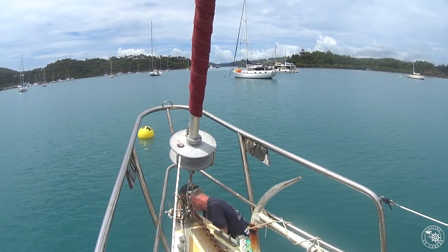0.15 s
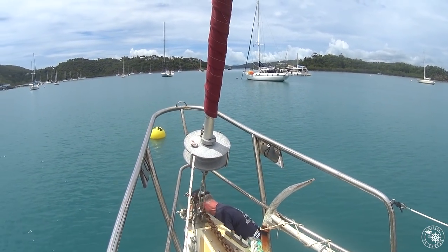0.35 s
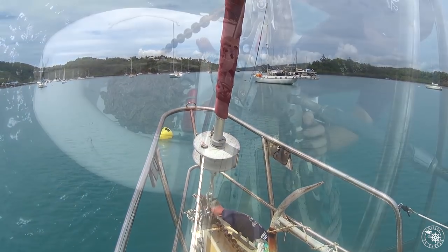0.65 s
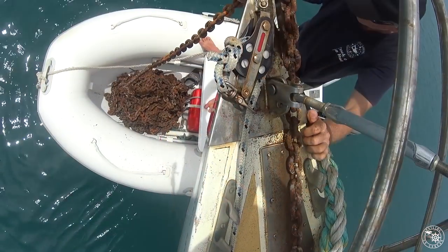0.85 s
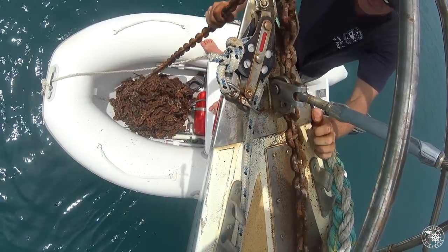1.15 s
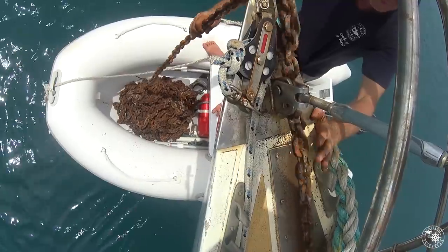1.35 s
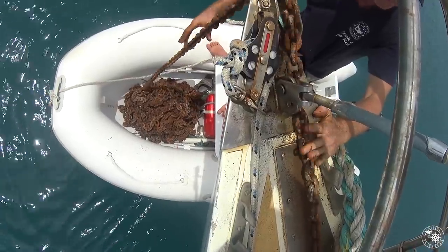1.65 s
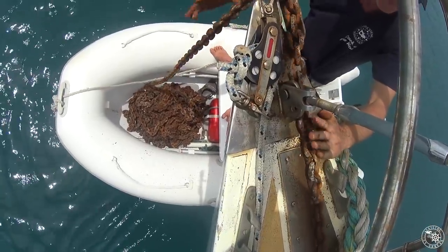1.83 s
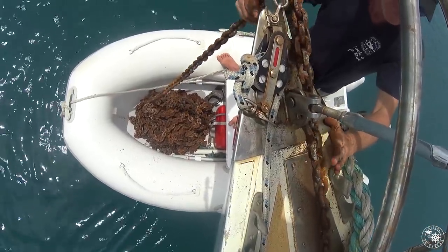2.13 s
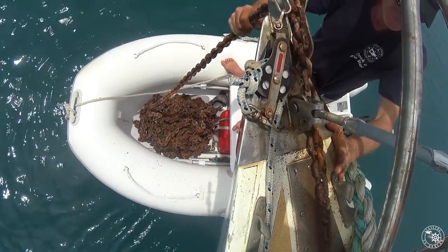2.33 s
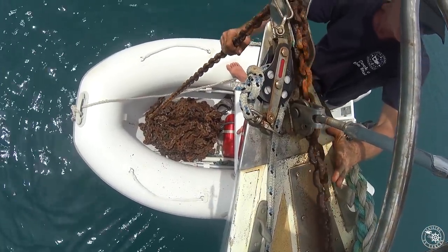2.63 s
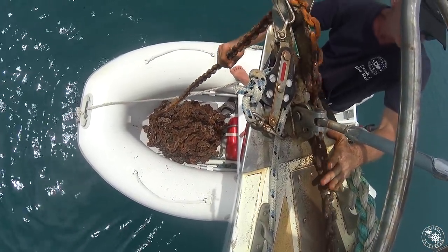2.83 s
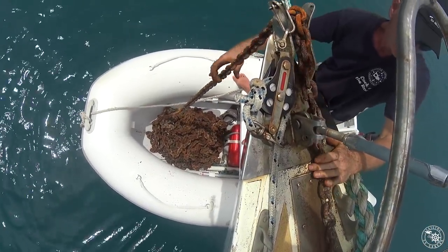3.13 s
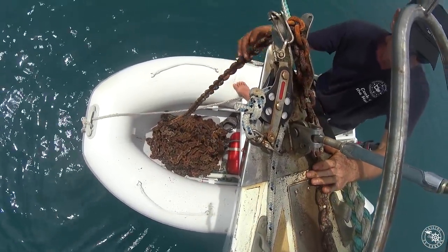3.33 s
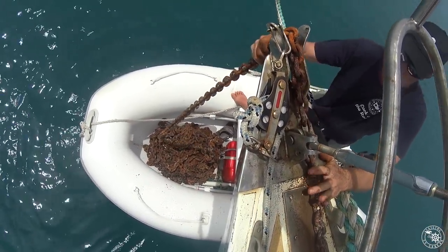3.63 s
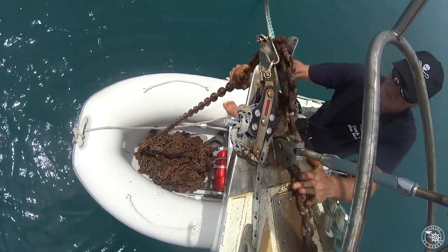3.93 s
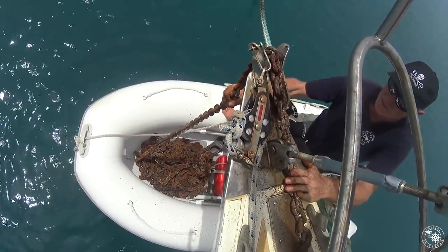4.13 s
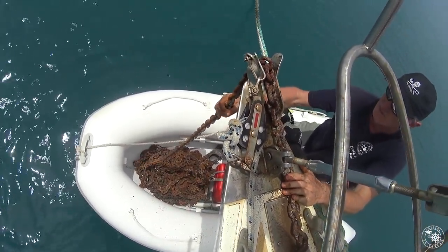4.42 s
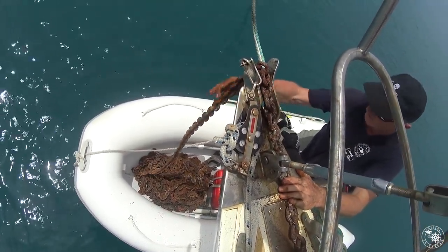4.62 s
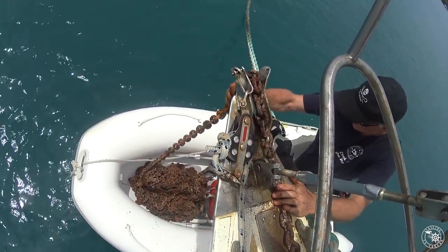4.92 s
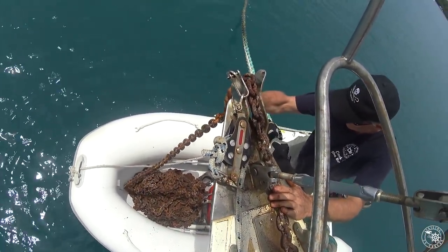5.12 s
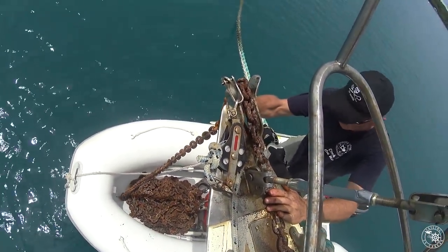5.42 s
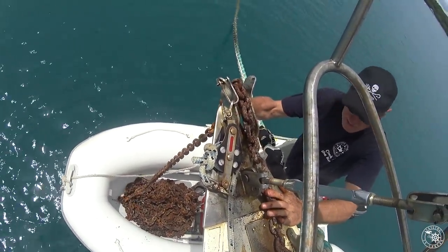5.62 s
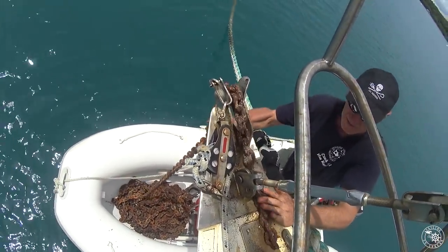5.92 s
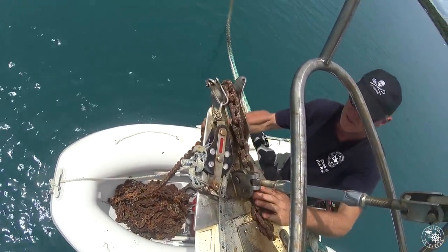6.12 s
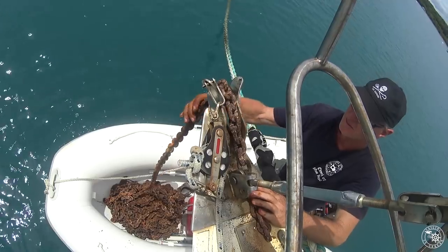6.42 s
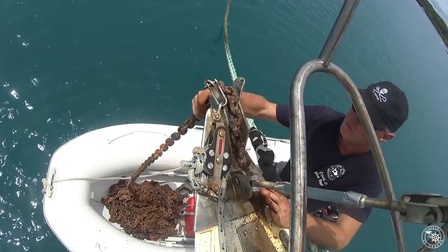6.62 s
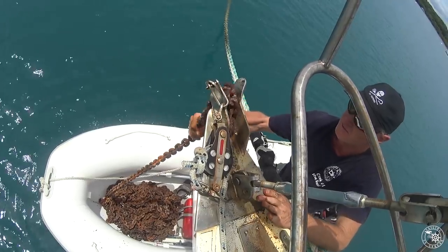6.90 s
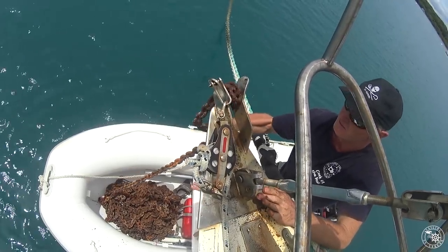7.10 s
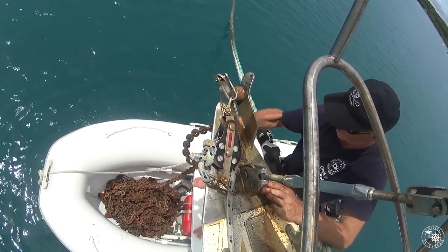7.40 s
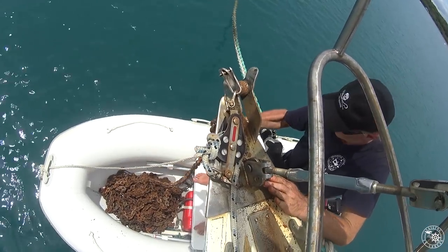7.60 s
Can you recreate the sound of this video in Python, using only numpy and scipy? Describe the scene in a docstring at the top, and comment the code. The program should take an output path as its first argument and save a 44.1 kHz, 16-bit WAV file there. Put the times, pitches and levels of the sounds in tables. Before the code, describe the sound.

Close by on a boat, rusty chain links scrape and clatter across a steel roller, squealing sharply as they rub. The hauling comes in uneven pulls: a long run, a brief tug, a lull with small snaps and dull knocks, then more ringing clanks before it settles. Small waves slap the hull and wind softly buffets the microphone, mostly late on, over a faint low hum.

```python
"""A rusty anchor chain is hauled by hand over a steel bow roller, in pulls with rests between.
Friction excites the modes of the links, which squeal near 10 kHz; stick-slip makes a jammed link groan.
Dense small contacts grind, single impacts clank and ring, and rust and rope snap in the pauses.
The deck knocks, wavelets slap the hull, and wind rumbles on a small microphone.
Underneath lies a steady background: low boat hum with faint lapping water."""
import sys
import numpy as np
from scipy import signal
from scipy.fft import rfft, irfft, next_fast_len
from scipy.io import wavfile
from scipy.ndimage import uniform_filter1d

SR = 44100
rng = np.random.default_rng(int(sys.argv[2]) if len(sys.argv) > 2 else 0)


def to_wav(sig):
    """Store sig (one row per channel, or 1-D mono) as 16-bit WAV at the path in sys.argv[1].

    Samples outside -1..1 are clipped; the rate is SR.
    """
    pcm = np.clip(np.atleast_2d(sig), -1, 1) * 32767
    pcm = np.round(pcm).astype(np.int16)
    wavfile.write(sys.argv[1], SR, pcm.T)  # frames by channels


N = 342083

# links rubbing over the roller: t/s of the bite, grip time/s, level/dB at the bite, gain/dB over the grip
RUBS = [(.039, 0.15, -34, -16), (.2, 0.044, -38.5, 11), (.335, 0.031, -31, -10), (.42, 0.037, -35.5, 6.5),
        (.51, 0.029, -38, 6), (.6, .01, -39, -2), (.63, 0.027, -35.5, 1.5), (0.709, 0.036, -36.5, -9),
        (.929, 0.1, -19, -3.5), (1.135, 0.11, -14.5, -6), (1.311, 0.045, -21, -3),
        (1.474, 0.078, -15.5, -7.5), (1.618, 0.069, -18.5, 5), (1.813, 0.14, -20.5, -6.5),
        (2.27, 0.094, -25.5, 8.5), (2.401, 0.016, -24, -6), (2.526, 0.096, -28, 13),
        (2.739, 0.11, -23.5, 2.5), (3.018, 0.077, -19.5, -14.5), (3.658, 0.2, -28.5, -5),
        (3.895, 0.053, -15, -9), (4.034, 0.095, -15.5, -17), (5.882, 0.08, -19.5, -21.5),
        (6.042, 0.053, -17, -27), (6.517, 0.15, -18, -12.5), (6.754, 0.0055, -17, -26),
        (6.806, 0.0078, -20, -7), (6.988, 0.0055, -24, -26)]
# modes of a link: f/Hz, bandwidth/Hz, level/dB
LINK_MODES = [(8380, 180, -5), (9050, 50, 6), (9580, 150, -7), (10240, 200, 7.5), (9680, 120, 6.5),
              (10810, 120, -0.5), (9000, 1500, -21)]
# course of the dragging: t/s, grind level/dB, deck rumble level/dB
DRAG_LEVELS = [(0, -40.5, -42), (.1, -58.5, -52), (.22, -46.5, -46.5), (.43, -45, -49), (.65, -56, -51),
               (.8, -57, -57), (.88, -34.5, -37), (1.2, -35, -41), (1.5, -30, -39), (2.05, -42, -39.5),
               (2.3, -32.5, -38.5), (2.76, -31.5, -46), (2.9, -33, -45.5), (3.05, -30, -39),
               (3.15, -74.5, -55), (3.61, -62.5, -54.5), (3.67, -32.5, -35.5), (3.86, -46, -51),
               (3.92, -36.5, -43), (4.1, -43, -45), (4.19, -76.5, -50), (4.8, -81, -55), (5.21, -62, -48),
               (5.28, -69, -45), (5.62, -70.5, -47.5), (5.78, -27, -32), (5.92, -33.5, -42),
               (6.05, -26, -33.5), (6.13, -74, -45), (6.4, -53, -46), (6.57, -33, -40), (6.74, -40, -63),
               (6.98, -25.5, -47), (7.05, -36, -45), (7.15, -48, -41), (7.25, -61.5, -46.5),
               (7.76, -65, -56)]
# impacts of links on the fitting: t/s of the peak, level/dB, rise time/s, T60/s, ring f/Hz
CLANKS = [(.048, -32, 0.0028, 0.026, 2330), (.162, -30, 0.0014, 0.036, 1350),
          (.197, -32, .0025, 0.086, 2200), (0.182, -35.5, 0.0015, 0.14, 3160), (.251, -34, .02, 0.3, 3050),
          (0.326, -23, .002, 0.028, 2270), (0.403, -23.5, 0.0042, 0.089, 2350),
          (.487, -21.5, .003, 0.19, 1500), (0.549, -25.5, 0.0065, 0.034, 1450),
          (0.595, -22.5, 0.0083, 0.045, 1480), (0.622, -24.5, 0.0076, 0.054, 1490),
          (.673, -33, 0.003, 0.1, 1490), (0.96, -19.5, .002, 0.075, 1820),
          (1.006, -10.5, 0.0017, 0.081, 2080), (1.054, -30, .002, 0.11, 1860),
          (1.094, -25.5, .002, 0.095, 2080), (1.148, -24.5, 0.0024, 0.047, 814),
          (1.241, -13, 0.017, 0.11, 1900), (1.31, -10.5, 0.0056, 0.025, 2000),
          (1.373, -14.5, 0.01, 0.12, 1640), (1.435, -18, 0.0028, .13, 1210),
          (1.521, -11.5, 0.0056, 0.09, 1820), (1.609, -13, 0.0076, 0.065, 1280),
          (1.649, -18, 0.0024, 0.2, 1990), (1.731, -15, 0.0042, 0.081, 1240),
          (1.761, -22, 0.0012, 0.025, 900), (1.808, -23, .016, 0.032, 1455),
          (1.889, -16.5, 0.0019, 0.026, 970), (1.943, -14.5, 0.0018, 0.31, 1300),
          (1.967, -18.5, 0.016, .14, 2040), (2.032, -16.5, 0.017, 0.099, 1380),
          (2.177, -19, 0.0036, 0.017, 1240), (2.257, -12.5, 0.028, 0.12, 1330),
          (2.47, -22, 0.033, 0.11, 1290), (2.55, -19.5, 0.021, 0.012, 1270),
          (2.582, -21, 0.0032, 0.04, 1570), (2.623, -13.5, 0.0045, 0.16, 1940),
          (2.729, -12, .0006, 0.076, 1410), (2.759, -9.5, 0.0087, 0.11, 1280),
          (2.914, -13.5, 0.00062, 0.063, 2030), (2.925, -13, .002, 0.04, 2210),
          (2.948, -10, .003, 0.1, 1260), (3.002, -14, 0.0042, 0.066, 1210),
          (3.37, -15.5, 0.00045, 0.071, 1210), (3.444, -31, 0.0015, .011, 2040),
          (3.78, -50.5, 0.0012, .045, 1250), (3.886, -12, 0.0047, 0.089, 1640),
          (3.952, -15.5, .0025, 0.19, 1500), (4.003, -17.5, .001, 0.21, 1640),
          (4.028, -12, 0.0021, .022, 1490), (4.081, -23.5, .006, 0.032, 1280),
          (4.108, -31, .0015, 0.035, 1090), (4.24, -21, .001, 0.037, 930), (4.3, -21, .003, 0.066, 1640),
          (4.323, -29, .001, 0.016, 2380), (4.35, -22.5, 0.0022, 0.091, 2460),
          (4.384, -24.5, 0.0005, 0.022, 1150), (4.488, -43, 0.00065, .014, 1140),
          (4.503, -38.5, .0005, .022, 800), (4.624, -46, .003, .05, 800), (4.736, -50, .001, .05, 800),
          (4.851, -43.5, .007, .095, 3720), (4.912, -21, 0.00048, .012, 1500),
          (4.924, -21, .0014, 0.044, 3740), (4.983, -36, .0025, 0.17, 1490),
          (5.103, -40.5, .0015, .06, 1570), (5.17, -31.5, .0014, .03, 890),
          (5.22, -34.5, 0.021, 0.19, 1600), (5.3, -25, 0.00041, 0.046, 3340), (5.64, -38, .004, 0.054, 969),
          (5.775, -23.5, 0.00152, 0.56, 2080), (5.832, -29, .002, 0.023, 1800),
          (5.862, -13, 0.00089, 0.094, 1980), (5.88, -10.5, 0.0083, 0.022, 1600),
          (5.917, -14, 0.0056, 0.24, 2480), (5.973, -14, 0.0093, 0.17, 2000),
          (6.098, -30, 0.0023, 0.039, 1550), (6.193, -36.5, .0014, 0.086, 3260),
          (6.309, -25, 0.00068, 0.026, 1220), (6.426, -33.5, .0012, 0.063, 2680),
          (6.586, -23, 0.014, 0.069, 830), (6.609, -26.5, 0.0036, 0.1, 1710),
          (6.643, -20, .002, 0.098, 1930), (6.682, -25, 0.00099, 0.041, 1290),
          (6.749, -10, 0.01, 0.26, 1340), (6.818, -9.5, 0.0074, 0.081, 3130),
          (6.85, -13.5, 0.0025, 0.1, 1340), (6.871, -14, .002, 0.055, 1530),
          (6.933, -11, .002, 0.037, 2150), (6.977, -18.5, .01, 0.045, 1250),
          (6.989, -10, .005, 0.094, 1320), (7.058, -8.5, 0.00071, 0.066, 1720),
          (7.078, -10, 0.0013, 0.036, 1300), (7.107, -12, 0.012, 0.1, 1280),
          (7.118, -17.5, .0014, 0.04, 1860), (7.159, -14, .0005, 0.11, 1820),
          (7.171, -18.5, .002, 0.1, 1260), (7.209, -19.5, 0.00073, 0.034, 1270),
          (7.276, -49.5, .0006, .011, 3350), (7.397, -35, .0016, .013, 4200),
          (7.468, -34, .0012, 0.027, 3950), (7.518, -22.5, 0.00083, 0.034, 790),
          (7.647, -37, .001, .01, 4240), (7.678, -42.5, 0.0016, .06, 3170)]


def link_squeaks():
    """Mode lock-in: friction sustains one mode of a link, a gliding tone that falters as rust grips."""
    # loud squeaks: t/s, duration/s, start f/Hz, end f/Hz, level/dB
    squeaks = [(0.041, .016, 10840, 10800, -27), (0.09, 0.031, 10900, 11000, -30),
               (0.133, .009, 10360, 10420, -21), (0.2, .008, 9500, 9240, -29),
               (0.323, .021, 10800, 10650, -32), (.417, .036, 10890, 10970, -32),
               (0.522, .016, 10500, 10400, -28.5), (0.929, .019, 10100, 9900, -11.5),
               (0.947, .023, 10300, 10960, -16), (.972, .008, 9120, 9160, -12),
               (1.015, .016, 10900, 10370, -15.5), (1.139, .011, 9500, 9740, -13),
               (1.146, .034, 9270, 9120, -15.5), (1.207, .022, 9400, 8880, -15),
               (1.315, .009, 9950, 9960, -12), (1.34, .009, 10050, 10730, -14),
               (1.378, .022, 9430, 8960, -17), (1.394, .014, 10740, 9930, -15),
               (1.475, .028, 9320, 9080, -15), (1.5, .01, 9650, 9800, -12), (1.527, .021, 9150, 8740, -19),
               (1.551, .005, 9450, 9500, -13), (1.617, .011, 10400, 10410, -15.5),
               (1.653, .027, 8940, 9040, -19.5), (1.689, .012, 10360, 10440, -19.5),
               (1.842, .032, 10460, 10670, -11.5), (1.89, .014, 10840, 11000, -13),
               (1.917, .026, 10570, 10230, -13), (2.272, .018, 10070, 10360, -12),
               (2.301, .009, 9620, 8900, -16), (2.317, .044, 10720, 10860, -16.5),
               (2.361, .009, 9890, 9860, -12), (2.404, .008, 9120, 9200, -17),
               (2.529, .008, 9590, 9500, -8), (2.556, 0.0049, 8980, 9170, -13),
               (2.566, .016, 9150, 9040, -11), (2.605, .01, 10660, 10400, -16),
               (2.627, .01, 9090, 8800, -17), (2.781, .016, 9760, 9900, -14),
               (2.802, .008, 11000, 10850, -11.5), (2.817, .02, 10450, 10900, -17.5),
               (2.84, .008, 10700, 11030, -12.5), (3.031, .04, 9550, 9960, -11.5),
               (3.07, .018, 10170, 9950, -12.5), (3.662, .033, 9910, 10100, -8.5),
               (3.705, .034, 10670, 10100, -15), (3.722, .031, 9900, 9700, -14),
               (3.759, .018, 9260, 9090, -7), (3.781, .028, 9740, 9500, -13), (3.818, .025, 9300, 9030, -9),
               (3.895, .043, 9120, 9160, -15.5), (3.925, .008, 9840, 9550, -13.5),
               (4.07, .013, 9150, 8920, -14), (4.108, .011, 9680, 10140, -14),
               (5.887, .008, 9270, 9000, -14.5), (5.937, .01, 9060, 9250, -18.5),
               (6.031, .047, 9580, 9800, -21), (6.046, .023, 8920, 9700, -16),
               (6.073, .031, 10160, 10620, -21.5), (6.511, .061, 10000, 10260, -21),
               (6.516, .042, 9840, 9620, -15.5), (6.569, .007, 10600, 10200, -13.5),
               (6.576, .037, 9100, 8930, -17.5), (6.607, .025, 9350, 9150, -14),
               (6.653, .005, 9180, 9180, -9.5), (6.809, .005, 9070, 8990, -19)]
    # faint chirps, some at half the pitch of a squeak: t/s, duration/s, start f/Hz, end f/Hz, level/dB
    chirps = [(2.53, .01, 4680, 4900, -27), (3.037, .008, 4960, 4860, -32),
              (3.778, 0.0074, 5130, 4840, -37), (3.816, .03, 4700, 4560, -36.5),
              (4.705, .037, 5800, 3400, -66), (4.845, .04, 3400, 3900, -59.5),
              (4.894, 0.028, 3100, 3940, -52)]
    lead_s, attack_s, release_db_per_s = .003, .0012, 2500
    out = np.zeros(N)
    falter = np.maximum(drift(120) - .5, 0)
    wobble = drift(90)
    for s, length, start_hz, end_hz, level_db in squeaks + chirps + faint_squeaks():
        t = np.arange(round((length + .04) * SR)) / SR
        hz = np.interp(t, [lead_s, lead_s + length], [start_hz, end_hz])
        release = from_db(-release_db_per_s * np.maximum(t - length - lead_s, 0))
        envelope = np.clip(t / attack_s, 0, 1) * release
        phase = 2 * np.pi * np.cumsum(hz) / SR + .8 * wobble[round(s * SR):][:len(t)]
        add(out, s - lead_s, from_db(level_db) * envelope * np.sin(phase))
    return out * from_db(1.5 - 6 * falter)


def faint_squeaks():
    """Brief lock-in: rows for two squeaks at random moments of each rub, each starting on a link mode."""
    mean_length_s, max_glide_hz, relative_db = .012, 200, -8.5
    rows = []
    for (s, grip, level_db, gain_db), draws in zip(RUBS, rng.random((len(RUBS), 2, 4))):
        for when, mode, glide, size in draws:
            start_hz = LINK_MODES[1 + int(mode * 5)][0]
            end_hz = start_hz + max_glide_hz * (2 * glide - 1)
            squeak_db = level_db + when * gain_db + relative_db
            rows.append((s + when * grip, mean_length_s * (.5 + size), start_hz, end_hz, squeak_db))
    return rows


def link_rubs():
    """Frictional excitation: slips of rust drive the link modes, each flaring and fading on its own."""
    bite_db_per_s, release_db_per_s = 2196.5, 900.5
    envelope = np.zeros(N)
    for s, grip, level_db, gain_db in RUBS:
        t = np.arange(-.03, grip + .06, 1 / SR)
        bite_db = bite_db_per_s * np.minimum(t, 0)
        grip_db = gain_db * np.clip(t / grip, 0, 1)
        release_db = -release_db_per_s * np.maximum(t - grip, 0)
        add(envelope, s + t[0], from_db(level_db + bite_db + grip_db + release_db))
    slips = grit(per_s=6000, spread_db=3.5)
    squeal = unit_rms(sum(from_db(db + 9 * drift(35)) * unit_rms(resonance(slips, hz, width)) * (-1) ** k
                          for k, (hz, width, db) in enumerate(LINK_MODES)))
    power = uniform_filter1d(squeal ** 2, size=900)
    return envelope * squeal / np.sqrt(power + .1)   # the modes share the friction power


def chain_drag():
    """Roughness noise: clumps of tiny contacts of rust on steel grind, and the deck rumbles along."""
    # spectrum of the grind: f/Hz, density level/dB
    grind_spectrum = [(290, -55), (500, -5.5), (786, -4.5), (1010, -1), (1350, 1), (2360, -9.5), (3760, -9),
                      (7370, -20), (8600, -28), (8940, -20.5), (11000, -16.5), (14300, -40.5),
                      (22000, -120)]
    grind_db, deck_db = in_time(DRAG_LEVELS)
    treble_db = -10.5 - .4 * (grind_db + 30)   # a light drag is relatively brighter
    contacts = grit(per_s=2500, spread_db=2.5) * from_db(3.4 * drift(30))
    ringing = unit_rms(steel_modes(contacts).sum(axis=0))
    steel = band(colour(contacts, grind_spectrum) + .26 * ringing, 600, 9000)
    low = signal.lfilter(*signal.butter(1, 3000, fs=SR), steel)
    grind = unit_rms(low) + from_db(treble_db) * unit_rms(steel - low)
    deck = unit_rms(band(grit(per_s=900, spread_db=2.7), 170, 640)) * from_db(4.1 * drift(20))
    return from_db(grind_db) * grind + from_db(deck_db) * deck


def steel_modes(force):
    """Modal response of chain and roller to a force, one row for each resonance."""
    # resonances of chain and roller: f/Hz, bandwidth/Hz, gain/dB
    modes = [(830.6, 51, -8), (1205, 110, -4.5), (1282, 20, -1.5), (1563, 62, 1.5), (1735, 50, -6.5),
             (2100, 200, 0.5), (2526, 67, -11.5), (3203, 39, -3.5), (3200, 11, -1), (3460, 43, -9.5),
             (3630, 70, -11.5), (4635, 80, -16), (5040, 68, -18.5), (6100, 78, -21)]
    return np.array([from_db(db) * resonance(force, hz, width) * (-1) ** k
                     for k, (hz, width, db) in enumerate(modes)])


def chain_clanks():
    """Impact excitation: each blow is a short crash that drives every mode with a random strength."""
    out = np.zeros(N)
    white = rng.standard_normal(N)
    chatter = grit(per_s=1800, spread_db=2.8)   # a crash is a run of tiny hits
    steel = unit_rms(band(chatter, 680, 4130))
    modes = unit_rms(steel_modes(chatter))
    deck = unit_rms(band(white, 320, 750))
    treble = unit_rms(band(chatter + white, 2300, 9700))
    blows = CLANKS + link_ticks()
    strengths = from_db(4.9 * rng.standard_normal((len(blows), len(modes))))
    for strength, (s, level_db, rise, t60, hz) in zip(strengths, blows):
        start = max(round((s - 5 * rise) * SR), 0)
        stop = min(start + round((5 * rise + 1.2 * t60) * SR), N)
        span = slice(start, stop)
        t = np.arange(start, stop) / SR - s
        envelope_db = np.where(t < 0, 8 * t / rise, -60 * t / t60)
        treble_db = -17 + .1 * (level_db + 12)   # harder blows are brighter
        ring = unit_rms(resonance(white[span], hz, width=150))
        crash = from_db(envelope_db) * (.49 * steel[span] + .32 * ring)
        crash += .093 * from_db(.71 * envelope_db) * (strength @ modes[:, span])   # the modes linger
        crash += .5 * from_db(treble_db + 5.4 * envelope_db) * treble[span]   # the treble dies first
        crash += .61 * from_db(-18.5 + .52 * envelope_db) * deck[span]   # the deck decays slowest
        age = np.maximum(t + rise, 0)
        click = np.exp(-rise / .003 - age / .0016) * np.sin(2 * np.pi * hz * age)   # strong if sudden
        out[span] += from_db(level_db) * (crash + 1.25 * click)
    return out


def link_ticks():
    """Random impacts: rows for sixty light blows whose strength follows the drag of the chain."""
    above_grind_db, spread_db, rise_s, mean_t60_s = 6, 6, .0015, .04
    low_hz, high_hz = 1100, 2530
    grind_db = in_time(DRAG_LEVELS)[0]
    rows = []
    for when, size, decay, pitch in rng.random((60, 4)):
        level_db = grind_db[int(when * N)] + above_grind_db + spread_db * (2 * size - 1)
        hz = low_hz * (high_hz / low_hz) ** pitch
        rows.append((when * N / SR, level_db, rise_s, mean_t60_s * (.5 + decay), hz))
    return rows


def link_groans():
    """Stick-slip oscillation: a jammed link slips regularly, giving a rough tone with harmonics."""
    # jams on the roller: t/s, duration/s, slip f/Hz, level/dB
    jams = [(0.543, 0.031, 1510, -32.5), (.59, 0.061, 1530, -37), (2.006, .036, 1450, -14.5),
            (2.214, 0.052, 1385, -13), (2.741, .025, 1300, -30.5), (3.874, 0.022, 1560, -18.5),
            (4.022, 0.0074, 1700, -20.5), (7.093, 0.018, 1310, -19), (7.157, 0.047, 1330, -18)]
    # harmonics of the slip frequency: order, level/dB
    harmonics = [(1, -1), (2, -13.5), (3, -12.5), (4, -30)]
    out, wobble = np.zeros(N), drift(70)
    for s, length, slip_hz, level_db in jams:
        t = np.arange(round(length * SR)) / SR
        phase = 2 * np.pi * slip_hz * t + .43 * wobble[round(s * SR):][:len(t)]
        tone = sum(from_db(db) * np.sin(order * phase) for order, db in harmonics)
        add(out, s, from_db(level_db) * np.sin(np.pi * t / length) ** .7 * tone)
    return out * from_db(2.5 * drift(120))


def steel_ring_outs():
    """Damped free vibration: a link rings as it lets go, the roller as the chain falls slack."""
    # links letting go: t/s, level/dB
    releases = [(1.04, -38.5), (1.26, -40), (1.71, -52), (1.96, -50), (2.64, -45), (2.86, -38.5),
                (3.1, -59), (4.13, -42.5), (6.11, -43.5), (7.18, -60)]
    # free modes of a link: f/Hz, relative level/dB, T60/s
    link_ring = [(10600, -0.5, .28), (8700, -12, .25)]
    # free modes of the roller: f/Hz, level/dB, T60/s
    roller_ring = [(1160, -34, 0.27), (1300, -36.5, .31), (1570, -41.5, .5), (3180, -35, 0.31)]
    slack_s, attack_s = 7.2, .004
    rings = [(s, hz, level_db + db, t60) for s, level_db in releases for hz, db, t60 in link_ring]
    rings += [(slack_s, *mode) for mode in roller_ring]
    out = np.zeros(N)
    for s, hz, level_db, t60 in rings:
        t = np.arange(round(t60 * SR)) / SR
        envelope = from_db(level_db - 60 * t / t60) * np.clip(t / attack_s, 0, 1)
        add(out, s, envelope * np.sin(2 * np.pi * hz * t))
    return out


def snaps():
    """Broadband transients: rust and rope snap brightly, and a duller crack opens each sudden clank."""
    # snaps of rust and rope in the pauses: t/s, level/dB
    dry_snaps = [(3.2624, -44), (3.4544, -34), (3.5747, -24.5), (4.176, -67), (4.3723, -24), (4.4558, -44),
                 (4.4863, -31.5), (4.503, -33), (4.6483, -52.5), (4.7326, -36), (4.814, -45),
                 (4.8414, -39.5), (4.8863, -31.5), (5.013, -37), (5.0594, -43.5), (5.1342, -35.5),
                 (5.352, -42.5), (5.4171, -38.5), (5.5648, -32), (6.3565, -49), (7.3243, -56), (7.502, -23),
                 (7.603, -35)]
    loss_db_per_s = 1999   # the slower a clank rises, the weaker its crack
    cracks = [(s - rise, db - 1 - loss_db_per_s * rise) for s, db, rise, t60, hz in CLANKS]
    return band(noise_bursts(dry_snaps), 2500, 11000) + band(noise_bursts(cracks), 1200, 6480)


def hollow_knocks():
    """Resonance of a hollow body: two close modes ring briefly inside a dull crash."""
    # knocks on the deck and gulps under the hull: t/s, level/dB, f/Hz, T60/s of the modes
    knocks = [(3.26, -30.5, 612, .08), (4.237, -16, 627, 0.1), (4.298, -20.5, 592, 0.1),
              (5.06, -47.5, 493, .05), (5.299, -27.5, 390, .035), (5.374, -25.5, 470, .095),
              (5.413, -29, 420, 0.087), (5.481, -33, 469, .08), (6.308, -34, 563, 0.067),
              (7.517, -37.5, 660, 0.18)]
    out = np.zeros(N)
    t = np.arange(round(.2 * SR)) / SR
    noises = unit_rms(band(rng.standard_normal((len(knocks), len(t))), 336, 1020))
    for (s, level_db, hz, t60), noise in zip(knocks, noises):
        modes = np.sin(2 * np.pi * hz * t) + .44 * np.sin(2 * np.pi * 1.1 * hz * t)
        envelope = from_db(level_db - 60 * t / t60) * (1 + .8 * np.exp(-t / .0034))
        crash = from_db(level_db - 8 - 35 * t / t60) * noise
        add(out, s, envelope * modes + crash)
    return signal.sosfilt(signal.butter(2, 250, "high", fs=SR, output="sos"), out + 1e-18)


def wavelet_and_gust_thuds():
    """Low pressure pulses: a Gaussian wave packet with a faint tail, its pitch rising a little."""
    # wavelets slapping the hull and gusts on the microphone: t/s, level/dB, f/Hz, duration/s
    thuds = [(0.597, -39, 216, 0.055), (0.897, -39, 322, 0.038), (1.456, -25, 316, 0.01),
             (1.747, -24, 330, 0.0077), (2.446, -30, 248, .016), (2.931, -31, 304, 0.012),
             (4.439, -35.5, 190, .011), (5.066, -25, 252, 0.0062), (5.557, -27.5, 94.5, 0.021),
             (5.831, -30, 278, 0.034), (6.125, -29, 89.6, 0.023), (6.304, -23.5, 125, 0.01),
             (6.36, -25.5, 212, 0.011), (6.404, -27, 203, 0.01), (6.532, -28, 180, .02),
             (6.836, -30.5, 101, .021), (6.957, -31.5, 195, 0.04), (7.251, -21.5, 281, 0.0071),
             (7.298, -8, 98, 0.0052), (7.436, -26, 112, 0.0089), (7.535, -13, 100.5, 0.0046),
             (7.562, -25, 98.3, .019)]
    out = np.zeros(N)
    t = np.arange(-.04, .1, 1 / SR)
    for s, level_db, hz, length in thuds:
        pulse = np.exp(-(t / (.22 * length)) ** 2 / 2)
        tail = .15 * from_db(-400 * t) * (t > 0)
        tone = np.sin(2 * np.pi * hz * (t + 5.5 * t ** 2))
        add(out, s + t[0], from_db(level_db) * (pulse + tail) * tone)
    return out


def wind_and_background():
    """Partly coherent noise in two channels: gusts on the microphone over a steady background."""
    # course of the wind: t/s, level/dB
    breeze = [(0, -62), (.6, -64), (.8, -90), (1, -73.5), (1.35, -78), (1.8, -59), (2.55, -54.5),
              (2.8, -79), (3.45, -48), (4.02, -70), (4.6, -49), (5.18, -44), (5.34, -50), (5.92, -40),
              (6.09, -42), (6.46, -40), (6.7, -48.5), (7.15, -34), (7.76, -49)]
    # spectrum of the wind: f/Hz, density level/dB
    wind_spectrum = [(12, -46.5), (20, -22.5), (118, 4), (145, -10.5), (203, -1), (338, -3.5), (387, -15),
                     (500, -41.5), (650, -64.5), (1100, -120)]
    # steady background, low boat hum with faint lapping water: f/Hz, density level/dB
    background_spectrum = [(18, -46.5), (30, -32), (96, -13), (196, -7), (257, -13), (726, -21),
                           (822, -23.5), (1050, -25.5), (1900, -35), (2150, -20.5), (2760, -36),
                           (11000, -58), (14300, -80.5), (22000, -120)]
    background_db, wind_side_db, background_side_db = -56.5, -6, -.5
    gusts = from_db(in_time(breeze)[0] + 6.4 * np.tanh(drift(14)))
    gain = from_db(background_db + 1.5 * drift(3.7))
    wind, wind_side = (colour(rng.standard_normal(N), wind_spectrum) * gusts for _ in range(2))
    noises = [rng.standard_normal(N) + .5 * grit(per_s=300, spread_db=4) for _ in range(2)]
    background, background_side = (colour(noise, background_spectrum) * gain for noise in noises)
    side = from_db(wind_side_db) * wind_side + from_db(background_side_db) * background_side
    return wind + background + side * [[1], [-1]]


def nearby_reflections(x):
    """Decorrelation: a copy smeared by nearby surfaces is added on the left, subtracted on the right."""
    # likeness of left and right: f/Hz, correlation coefficient
    correlation = [(60, .85), (125, .5), (250, .55), (500, .87), (1000, .9), (4000, .84), (9000, .96)]
    balance_db, taps = -.4, 2400   # balance is left minus right
    size = next_fast_len(N + 4096)
    smear = rng.standard_normal(taps) * from_db(-30 * np.arange(taps) / taps)
    alike = np.clip(at_hz(correlation, np.fft.rfftfreq(size, 1 / SR) + 1), 0, .999)
    response = rfft(smear / np.linalg.norm(smear), size) * np.sqrt((1 - alike) / (1 + alike))
    side = irfft(rfft(x, size) * response, size)[:N]
    return (x + side * [[1], [-1]]) * from_db([[balance_db / 2], [-balance_db / 2]])


def from_db(db):
    """Amplitude ratio of a level."""
    return 10 ** (np.asarray(db) / 20)


def unit_rms(x):
    """Normalisation to a mean power of 1."""
    return x / np.sqrt(np.mean(x ** 2) + 1e-20)


def in_time(rows):
    """Linear interpolation over time, one curve for each column after the first."""
    s, *columns = np.transpose(rows)
    return [np.interp(np.arange(N) / SR, s, column) for column in columns]


def at_hz(points, hz):
    """Interpolation on a logarithmic frequency axis."""
    known_hz, values = np.transpose(points)
    return np.interp(np.log(hz), np.log(known_hz), values)


def drift(corner_hz):
    """Low-passed noise: a slow random fluctuation of rms 1."""
    r = np.exp(-16 * np.pi * corner_hz / SR)   # double pole, run at SR / 8
    slow = signal.lfilter([1], [1, -2 * r, r * r], rng.standard_normal(N // 8 + 4002))[4000:]
    return np.interp(np.arange(N) / 8, np.arange(len(slow)), unit_rms(slow))


def resonance(x, hz, width):
    """Damped resonator: a two-pole peak of gain 1, its width in Hz."""
    r = np.exp(-np.pi * width / SR)
    feedback = [1, -2 * r * np.cos(2 * np.pi * hz / SR), r * r]
    return signal.lfilter(np.array([1, 0, -1]) * (1 - r * r) / 2, feedback, x)


def band(x, low_hz, high_hz):
    """Band-pass filtering."""
    return signal.sosfilt(signal.butter(2, [low_hz, high_hz], "band", fs=SR, output="sos"), x)


def colour(x, spectrum):
    """Spectral shaping, scaled to rms 1."""
    hz = np.fft.rfftfreq(N, 1 / SR) + 1
    return unit_rms(irfft(rfft(x) * from_db(at_hz(spectrum, hz)), N))


def grit(per_s, spread_db):
    """Shot noise: random contacts of uneven size, scaled to rms 1."""
    sizes = from_db(spread_db * np.minimum(rng.exponential(1, N), 5)) * rng.choice([-1, 1], N)
    return unit_rms(sizes * (rng.random(N) < per_s / SR))


def noise_bursts(rows, t60=.016):
    """Exponentially decaying noise, one burst for each row of t/s, level/dB."""
    out = np.zeros(N)
    t = np.arange(round(.04 * SR)) / SR
    for (s, level_db), noise in zip(rows, rng.standard_normal((len(rows), len(t)))):
        add(out, s, from_db(level_db - 60 * t / t60) * noise / 2)
    return out + 1e-18


def add(out, s, piece):
    """Superposition of a piece, starting at s seconds."""
    at = max(round(s * SR), 0)
    out[at:at + len(piece)] += piece[:N - at]


def scene():
    """Superposition in stereo: chain, knocks and thuds with reflections, over wind and background."""
    chain = link_squeaks() + link_rubs() + chain_drag() + chain_clanks()
    chain += link_groans() + steel_ring_outs() + snaps()
    return nearby_reflections(chain + hollow_knocks() + wavelet_and_gust_thuds()) + wind_and_background()


def record(dry):
    """Saturation and band limiting: peaks are rounded, then two steep low-passes cut the top treble."""
    ceiling, passband_hz, stopband_hz = .62, 11050, 14793.6
    rounded = ceiling * np.tanh(dry / ceiling)
    limited = signal.sosfilt(signal.ellip(10, .5, 52, passband_hz, fs=SR, output="sos"), rounded)
    return signal.sosfilt(signal.cheby2(8, 40, stopband_hz, fs=SR, output="sos"), limited)


dry = scene()
out = record(dry)
to_wav(out)
```